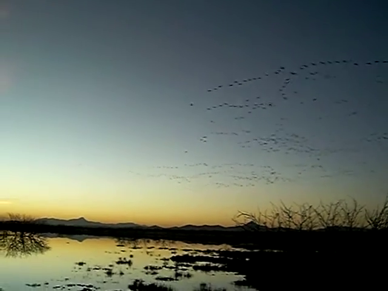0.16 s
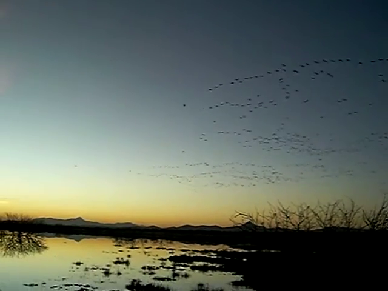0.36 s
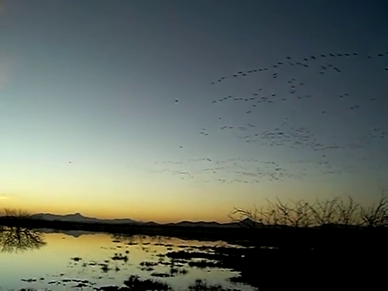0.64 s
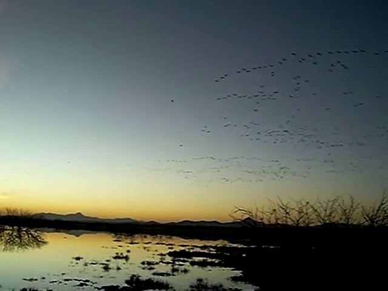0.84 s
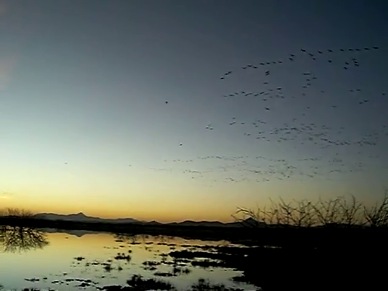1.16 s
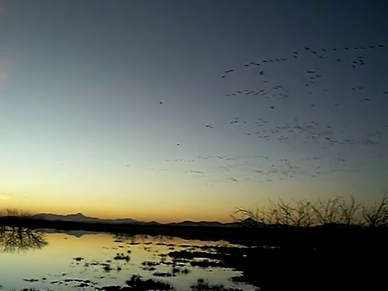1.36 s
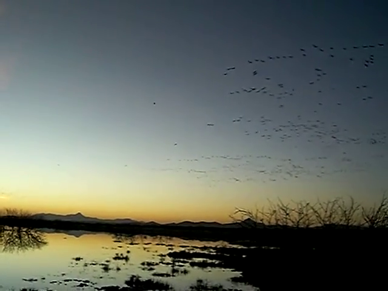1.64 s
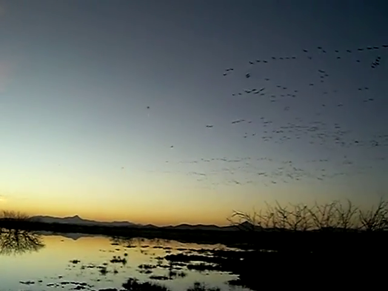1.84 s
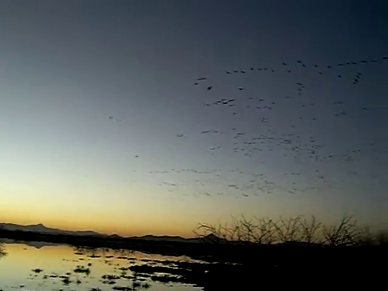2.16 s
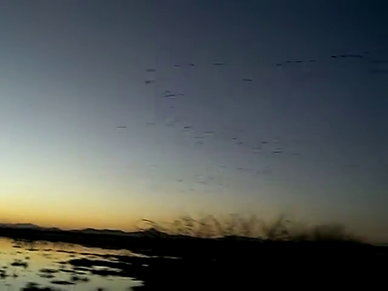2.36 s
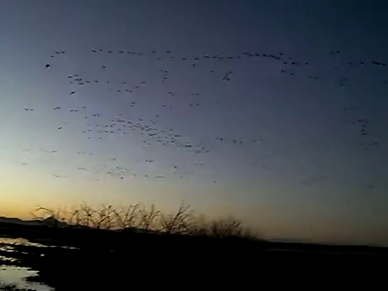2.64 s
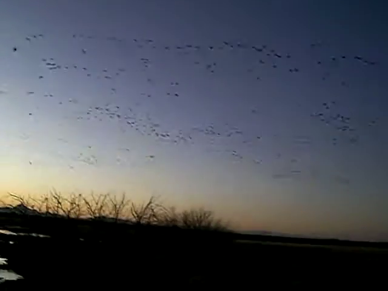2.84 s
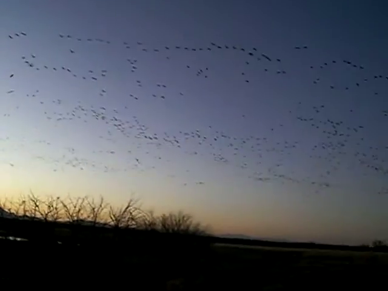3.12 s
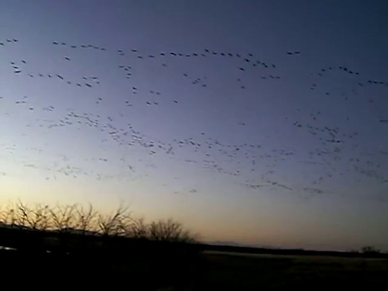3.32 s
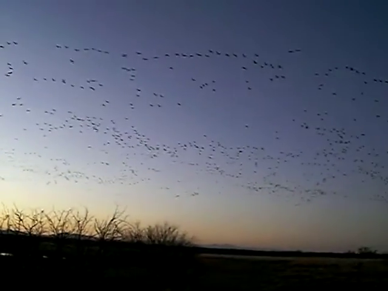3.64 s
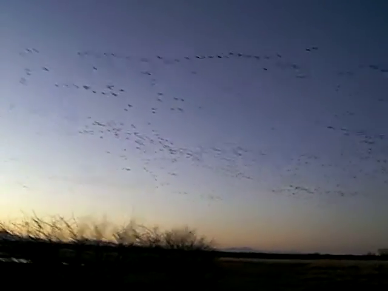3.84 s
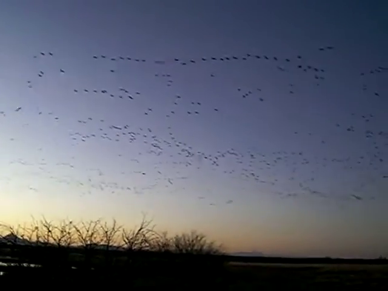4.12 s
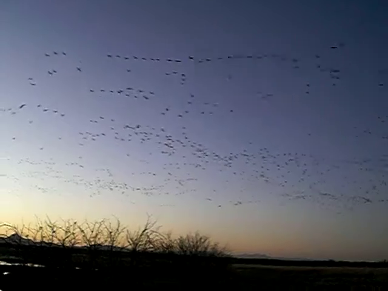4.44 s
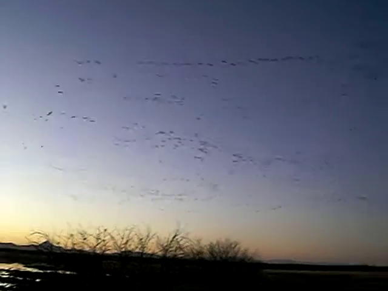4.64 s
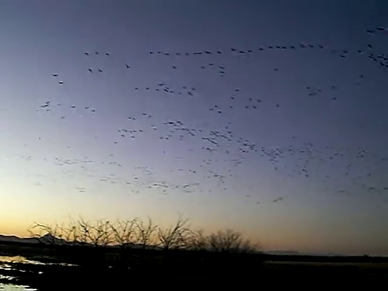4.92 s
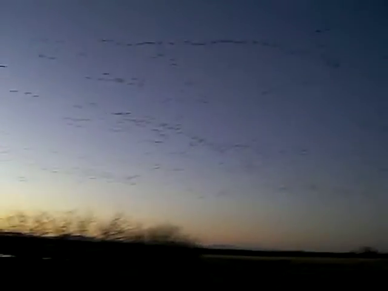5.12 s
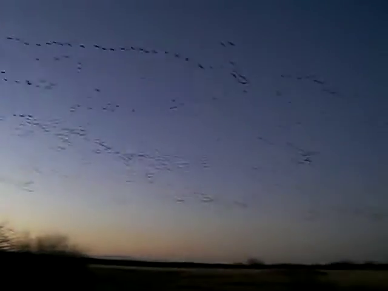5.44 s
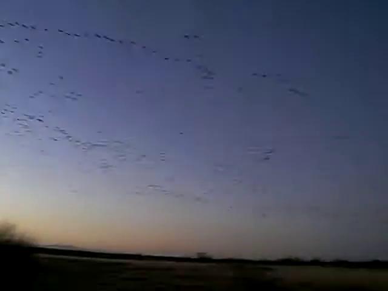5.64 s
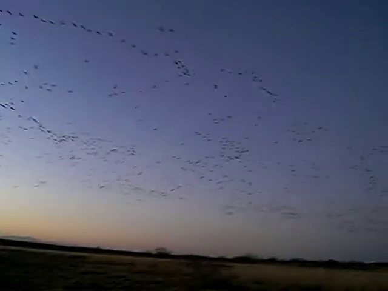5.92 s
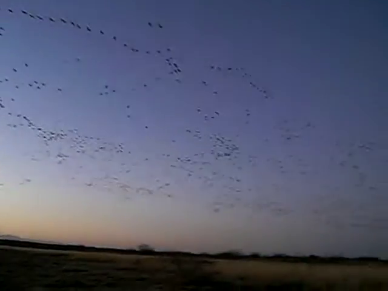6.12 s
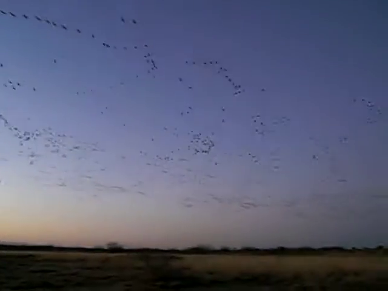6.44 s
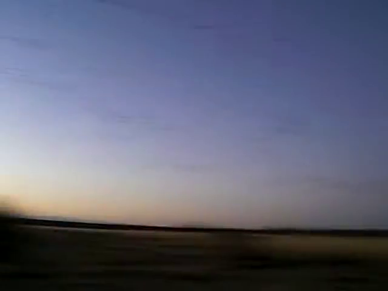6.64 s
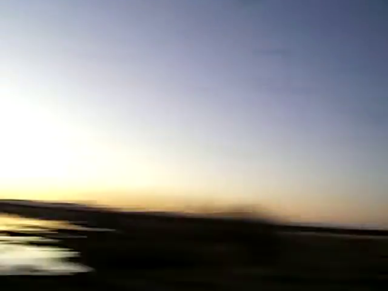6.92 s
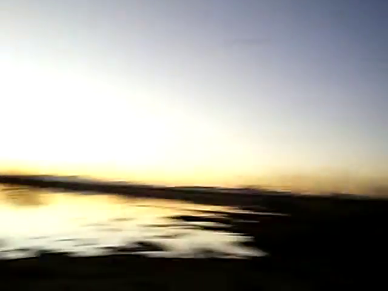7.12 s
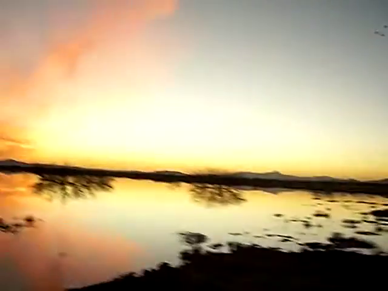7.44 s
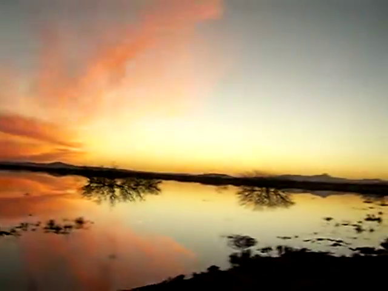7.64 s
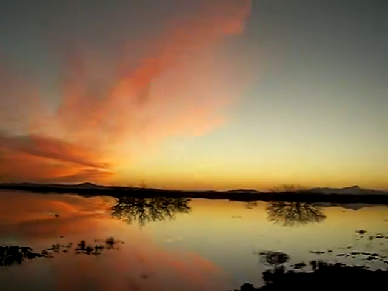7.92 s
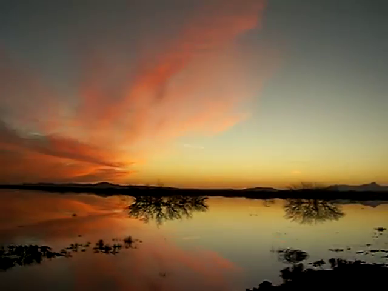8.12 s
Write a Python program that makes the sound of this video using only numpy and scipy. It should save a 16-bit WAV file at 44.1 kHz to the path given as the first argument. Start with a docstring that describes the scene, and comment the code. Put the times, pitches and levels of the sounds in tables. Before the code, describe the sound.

A huge flock of cranes passes over an open marsh, hundreds of short rattling bugles merging into a constant mid-pitched din. Single nearer calls keep popping out, each a quick rolled trill. A few goose honks come late. The small hand-held camera adds faint hiss, and after about six and a half seconds a sharp click and dull finger thumps as it swings around.

```python
"""An open marsh at dusk: hundreds of crane calls overhead, with a few goose honks among them.
Each crane call is a bugle chopped into rattling pulses; shaped noise makes the steady din of the farthest birds.
Reeds, water and banks lend a faint noise tail. Two sine tones are the hum and whine of a hand-held camera,
over soft noise; damped tones are bumps on its body, and short noises are clicks and finger rubs."""
import sys
import numpy as np
from scipy import signal
from scipy.fft import rfft, irfft, next_fast_len
from scipy.io import wavfile
from scipy.ndimage import uniform_filter1d

SR = 44100
rng = np.random.default_rng(int(sys.argv[2]) if len(sys.argv) > 2 else 0)


def log_audio(samples):
    """Write samples as a 16-bit WAV file to the path given in sys.argv[1]."""
    # one column per channel
    frames = np.atleast_2d(samples).T
    # limit to full scale, then quantise
    limited = np.clip(frames, -1, 1)
    pcm = np.round(limited * 32767).astype(np.int16)
    wavfile.write(sys.argv[1], SR, pcm)


N = 364707  # length in samples

# colour of the soft rumble and hiss: [f/Hz, relative level/dB]
FLOOR_COLOUR = [(25, -11.5), (75, -1.5), (150, -2.5), (300, -5), (1000, -1), (6000, -23.5), (8300, -21.5),
                (9000, -20.5), (11000, -20.5), (11800, -21.5), (12600, -20), (14500, -19), (15600, -12),
                (16100, -25)]
# camera hum and whine: [f/Hz, rms level/dB]
CAMERA_TONES = [(109, -70), (15734, -70)]
# fingers bump the camera body: [t/s, level/dB before trim and tone, f/Hz, t60/s]
BUMPS = [(0.401, -47, 250, 0.036), (2.081, -38, 250, 0.017), (5.35, -45, 113, 0.093),
         (6.632, -30, 332, 0.031), (6.855, -45, 60, 0.055), (7.083, -31, 139, 0.023), (7.297, -34, 60, .03),
         (7.3035, -17, 60, 0.022), (7.596, -35, 60, .028), (7.6293, -20, 61, 0.017),
         (7.8265, -35, 71.4, .025), (7.846, -30, 60.3, 0.026)]
# the camera case clicks: [t/s, level/dB before trim and tone]
CLICKS = [(2.074, -33), (4.725, -33), (6.634, -35), (6.769, -31), (6.8439, -6.5), (6.852, -34),
          (6.942, -34)]
# fingers slide on the case: [t/s, length/s, level/dB before trim and tone]
RUBS = [(5.677, 0.11, -53.5), (5.964, .13, -55), (6.176, .12, -57), (6.595, .025, -47), (7.012, .025, -46)]
# ring of the plastic case: [f/Hz, gain/dB]
CASE_RING = [(1500, -15), (4000, -8), (8200, 4), (10000, -3), (11800, 6), (13000, -1), (15500, 5)]
# colour of the farthest birds: [f/Hz, relative level/dB]
DIN_COLOUR = [(190, -75), (330, -35.5), (470, -28), (643, -9), (704, -9.5), (824, -5), (1130, -3),
              (1200, -13.5), (1500, -20), (2440, -26), (3170, -32), (4060, -39), (4750, -54), (5270, -64),
              (7500, -55.5), (9750, -81), (16500, -120)]
# the cranes' long windpipe, heard through the air: [f/Hz, relative level/dB]
WINDPIPE = [(350, -42), (520, -12), (680, -15), (820, 2), (1180, 2), (1330, -10.5), (1500, -17),
            (2000, -17), (2500, -20.5), (3100, -29), (4100, -30), (5800, -37.5), (7500, -46.5),
            (11000, -73)]
# which voices lead the chorus: [t/s, gain of the highest voices and loss of the lowest/dB]
HIGH_VOICE_LEAD = [(0, 1.9), (4.3, 2), (4.9, 3), (6.35, 1), (6.65, 0), (8.27, -2.5)]
# swell of the flock's low band, the fundamentals: [t/s, level/dB before trim]
BODY_LEVEL = [(0.0, -23.0), (0.88, -24.0), (1.54, -22.5), (2.04, -24), (2.67, -22.5), (3.51, -22.0),
              (3.64, -22.5), (4.13, -20.5), (4.34, -24), (4.47, -22), (4.6, -23.5), (5.18, -20.5),
              (5.31, -22.5), (6.22, -22), (6.68, -24.5), (6.85, -23), (8.27, -26)]
# swell of the overtones, the bugling middle of the voices: [t/s, level/dB before trim]
OVERTONE_LEVEL = [(0, -39), (0.34, -39), (1.1, -40.5), (1.52, -38.5), (1.77, -42), (2.76, -36.5),
                  (2.85, -39), (4.19, -37), (4.24, -40.5), (4.33, -38.5), (5.78, -38.5), (6.42, -36),
                  (6.61, -39.5), (6.86, -39.5), (8.04, -42), (8.27, -38)]
# swell of the treble, the rasp of the voices: [t/s, level/dB before trim]
RASP_LEVEL = [(0.0, -47), (1.34, -47.5), (1.46, -45.5), (1.96, -47), (2.75, -45), (2.88, -48.5),
              (3.42, -46), (3.64, -49), (3.88, -46), (4.8, -45), (5.1, -44.5), (5.3, -47), (5.76, -50),
              (6.01, -46), (6.68, -50.5), (6.81, -44), (7.64, -50.5), (8.14, -50), (8.27, -45.5)]
# nearer cranes: [t/s, length/s, f/Hz, glide/octaves, level/dB before trim, throat resonance f/Hz,
#                 resonance level over the fundamental/dB, rolls per second, roll depth 0-1]
CRANES = [ (0.00, 0.24, 1276, -0.082, -32.5, 3800, -25, 25, 0.9),
          (0.199, 0.12, 1030, -0.06, -33, 2060, -18, 21, 0.7),
          (0.322, 0.16, 862, -0.055, -27.5, 1900, -19, 30.6, 1),
          (0.445, .23, 1156, -0.049, -35.5, 3450, -17, 38, 0.8),
          (0.651, 0.18, 1333, -0.025, -31.5, 2690, -12.5, 29, 1),
          (0.971, 0.21, 1093, -.04, -31, 2190, -20, 27, .9),
          (1.029, 0.2, 990, -.06, -34, 3900, -20.5, 27, 1), (1.32, 0.1, 990, -.03, -37.5, 1970, -2, 26, 1),
          (1.425, 0.14, 997, -0.08, -29, 2110, -9, 28, 0.5),
          (1.52, 0.23, 1342, -0.0029, -37, 4000, -29, 28, 0.9),
          (1.647, 0.076, 975, -.09, -33.5, 1950, -8, 25, 1),
          (1.743, 0.16, 1100, -0.0029, -29.5, 5500, -29, 30, 0.8),
          (2.276, 0.15, 1020, -0.22, -38, 4080, -21, 29, 1),
          (2.431, 0.14, 776, -0.025, -40, 1560, -6, 27, 0.6),
          (2.55, 0.2, 849, -0.052, -28, 2400, -24, 22.3, 0.5),
          (2.68, 0.09, 1185, -.3, -34, 3500, -18, 27, 0.8),
          (2.815, 0.15, 866, 0.042, -28, 1730, -24, 22.4, 0.7),
          (3.056, 0.14, 1156, -0.0057, -26.5, 2300, -27, 26, 0.9),
          (3.128, 0.19, 982, -0.015, -32, 3940, -25, 25, 0.8),
          (3.39, 0.15, 1128, .05, -27, 2260, -24, 38.4, 0.84),
          (3.699, 0.14, 1125, 0, -31, 4480, -27, 28, 0.6),
          (3.829, 0.21, 921, -0.088, -30, 1840, -24, 30, 0.76),
          (3.85, 0.18, 842, -.02, -30.5, 1680, -14.5, 26, 0.7),
          (3.86, .2, 1050, 0.061, -42, 3150, -15, 38, .5),
          (4.07, .15, 852, -0.0016, -29.5, 1980, -10, 22, 0.3),
          (4.058, 0.2, 1084, -.02, -37, 4300, -19, 26, 1),
          (4.33, 0.21, 1130, -0.048, -39, 4500, -16, 25, 0.9),
          (4.411, 0.094, 882, 0.021, -26, 2700, -22, 28, 0.9),
          (4.709, 0.16, 945, -.03, -39, 3780, -22, 30, 0.96),
          (4.849, .18, 1106, 0.0026, -27.5, 2210, -16, 28, 1),
          (5.00, 0.21, 1164, 0.039, -29.5, 2320, -23, 28, .95),
          (5.006, 0.17, 1085, -0.04, -40, 4320, -17, 27, .8),
          (5.041, .13, 950, -0.12, -40, 2850, -8, 27, 1), (5.189, .25, 765, 0.096, -34, 1530, -8, 27, 0.6),
          (5.3, 0.15, 812, -.02, -37, 1620, -14, 21, .9),
          (5.301, 0.23, 948, 0.0087, -31.5, 2850, -22, 30, 1),
          (5.57, 0.18, 1184, -0.0066, -29, 2380, -25, 28, 1),
          (5.919, .13, 895, -0.044, -31.5, 2690, -18, 26, 0.65),
          (5.951, 0.23, 1100, -0.0098, -36, 4400, -26, 20, 0.6),
          (6.128, 0.14, 1128, -0.081, -26, 2250, -13.5, 25.3, 0.4),
          (6.17, 0.19, 1202, 0.0294, -28, 2400, -21, 26, 1),
          (6.276, 0.082, 1048, -0.15, -30.5, 2100, -9, 32, 0.5),
          (6.29, 0.18, 1215, -0.061, -34, 2430, -17, 31, 1),
          (6.373, 0.094, 895, -.05, -35, 1790, -12, 31, 0.9),
          (6.477, 0.103, 875, -0.037, -32.5, 1750, -6, 32, .55),
          (6.475, 0.16, 980, 0.012, -29.5, 1960, -25, 26, 1),
          (6.99, 0.066, 840, .02, -29, 1680, -13, 31, 0.8),
          (7.188, 0.17, 1130, -0.055, -32.5, 2260, -11, 32, 0.2),
          (7.186, 0.15, 898, 0, -32.5, 3600, -23, 27, 0.7),
          (7.253, 0.17, 1075, -0.044, -37, 3220, -19, 27, .5),
          (7.382, 0.18, 889, -0.068, -31.5, 1780, -22, 22, 0.9),
          (7.475, 0.18, 940, -0.03, -34.5, 1870, -13, 32, 0.9),
          (7.98, 0.13, 1225, -0.084, -46, 2450, -12, 27, 1)]
# nearer geese: [t/s, length/s, f/Hz, level/dB before trim]
GEESE = [(6.091, 0.12, 624, -44), (6.782, 0.13, 660, -34.5), (7.53, 0.074, 590, -40.5)]
# notches of the microphone housing: [f/Hz, width/Hz, depth 0-1]
HOUSING_NOTCHES = [(2179, 137, 0.56), (4710, 510, 0.76), (7920, 160, 0.6), (9300, 240, 0.6)]

OVERTONES_FROM_HZ, RASP_FROM_HZ = 1480, 2750  # band edges of the flock
DEEPEST_HZ, SHRILLEST_HZ = 500, 6500  # band of the nearer birds
CALL_S, CALL_SCATTER_S = 0.24, 0.09  # chorus call length, and its scatter either way
SAG_OCTAVES, GLIDE_SCATTER_OCTAVES = 0.04006, 0.1189  # calls bend either way, more often downwards
SLIDE_OCTAVES = 0.12  # a few calls slide down steeply
BURST_S = 0.0035  # decay time of the harsh start of a pulse
GRIT_DB = -36  # recorder hiss relative to the sound passing through
TOP_HZ = 16000  # recorder band limit


def amp(db):
    """Decibels to gain."""
    return 10 ** (np.asarray(db) / 20)


def unit(x):
    """Scale to rms 1."""
    return x / np.sqrt(np.mean(x ** 2) + 1e-20)


def curve(points):
    """One value per sample along (s, value) points."""
    return np.interp(np.arange(N) / SR, *np.transpose(points))


def wobble(t, rate):
    """A random curve with rate knots a second."""
    knots = rng.standard_normal(size=512)
    return np.interp(t * rate, np.arange(len(knots)), knots)


def add(track, s, sound):
    """Mix a sound into a track at a time, trimmed to the track's ends."""
    start = round(s * SR)
    part = sound[max(-start, 0):max(len(track) - start, 0)]
    track[max(start, 0):][:len(part)] += part


def filtered(x, response):
    """x times a response of frequency."""
    m = next_fast_len(N + SR // 2)
    return irfft(rfft(x, m) * response(np.fft.rfftfreq(m, 1 / SR)), m)[:N]


def coloured(x, points):
    """x through (Hz, dB) points on a log axis."""
    f, db = np.transpose(points)
    return filtered(x, lambda hz: amp(np.interp(np.log(hz + 1), np.log(f), db)))


def below(x, edge_hz):
    """The part of x under a steep edge."""
    return filtered(x, lambda hz: 1 / (1 + (hz / edge_hz) ** 20))


def floor(noise_db=-53):
    """Soft rumble and hiss from shaped noise, with the camera's hum and whine as steady sines."""
    t = np.arange(N) / SR
    tones = sum(amp(db) * unit(np.sin(2 * np.pi * hz * t)) for hz, db in CAMERA_TONES)
    noise = unit(coloured(rng.standard_normal(N), FLOOR_COLOUR))
    return amp(noise_db) * noise + tones


def bumps(trim_db=3, attack_s=0.00054):
    """Dull, heavily damped tones of fingers bumping the camera body."""
    track = np.zeros(N)
    t = np.arange(SR // 10) / SR
    for s, db, hz, t60 in BUMPS:
        decay = amp(db + trim_db - 60 * t / t60)
        attack = 1 - np.exp(-t / attack_s)
        add(track, s, decay * attack * np.cos(2 * np.pi * hz * t))
    return coloured(track, [(20, -5.0), (350, 0.5), (900, 5), (3000, -60)])


def clicks_and_rubs(click_db=-10.0, click_t60=0.0036, snap_gain=4.3, rub_db=-1, grain_db=4):
    """Tiny clicks and grainy finger rubs: noise that rings through the plastic camera case."""
    track = np.zeros(N)
    t = np.arange(SR // 10) / SR
    for s, db in CLICKS:
        # one sharp edge, then a brief rattle
        snap = np.r_[snap_gain, rng.standard_normal(len(t) - 1)]
        add(track, s, amp(db + click_db - 60 * t / click_t60) * snap)
    for s, length, db in RUBS:
        t = np.arange(int(length * SR)) / SR
        slips = unit(amp(grain_db * wobble(t, 404)) * rng.standard_normal(len(t)))
        add(track, s, amp(db + rub_db) * np.hanning(len(t)) * slips)
    return coloured(track, CASE_RING)


def marsh(x, wet_db, t60=0.72):
    """Reeds, water and banks scatter a faint diffuse tail."""
    t = np.arange(SR) / SR
    tail = rng.standard_normal(SR) * amp(-60 * t / t60)
    return x + amp(wet_db) * signal.fftconvolve(x, tail / np.linalg.norm(tail))[:N]


def cycle(harmonic_db, size=2048):
    """One period of a voice with these harmonic levels."""
    k = np.arange(len(harmonic_db)) + 1
    return amp(harmonic_db) @ np.sin(2 * np.pi * np.outer(k, np.arange(size) / size))


def call(length, hz, glide, period, roll_rate, roll_depth, jitter, chirp,
         drift=0.097, arch=0.03413, fade=5.54, uneven_db=1.5, burst=0.61):
    """One call: an arching pitch, chopped into quick, uneven pulses that start harshly and fade."""
    t = np.arange(int(length * SR)) / SR
    u = t / length - 0.5
    beats = roll_rate * t + 1 + drift * wobble(t, 18.23)
    beat = beats % 1  # position inside the pulse
    strength = amp(uneven_db * rng.standard_normal(size=64))[beats.astype(int)]
    pulse = unit(strength * beat * (1 - beat) * np.exp(-fade * beat))
    # the pitch follows the air pressure inside each pulse
    octaves = glide * u - arch * (2 * u) ** 2 + chirp * (pulse - 1) + jitter * wobble(t, 251.7)
    phase = np.cumsum(hz * np.exp2(octaves)) / SR
    voice = period[(phase * len(period)).astype(int) % len(period)]
    swell = np.sqrt(np.abs(1 - (2 * u) ** 2))
    # each pulse bursts open with a brief, rough spike
    spike = burst * strength * np.exp(-beat / roll_rate / BURST_S) * (1 + wobble(t, 1200))
    roll = 1 - roll_depth + roll_depth * (pulse + spike)
    return unit(voice * swell * roll)


def din():
    """The farthest birds, merged into a steady band of shaped noise."""
    return unit(coloured(rng.standard_normal(N), DIN_COLOUR))


def chorus(count=800, spread_db=2.0, bright_db=3.0, roll_rate=27, mid_hz=980):
    """Overlapping crane calls, each with its own pitch, timbre, roll and closeness."""
    track = np.zeros(N)
    # high and low voices take turns, so every register stays busy
    registers = np.concatenate([rng.permutation(np.linspace(-1, 1, 20)) for _ in range(count // 20)])
    for i, (when, long, detune, glide, roll, near) in enumerate(rng.uniform(-1, 1, (count, 6))):
        s = (i + when) / count * (N / SR + 0.2) - 0.2
        hz = mid_hz * 2 ** (0.5 * registers[i] + detune / 30)
        closeness = near + near ** 3
        # the air takes the overtones of far birds, so only close ones ring out up high
        overtone_db = bright_db * (closeness - 1) + 1.3 * rng.standard_normal(size=6)
        period = cycle(np.r_[0, overtone_db])
        rate = roll_rate * (1 + 0.239 * roll)
        length = CALL_S + CALL_SCATTER_S * long
        bend = GLIDE_SCATTER_OCTAVES * glide - SAG_OCTAVES
        bend -= SLIDE_OCTAVES * min(glide, 0) ** 6
        voice = call(length, hz, bend, period, rate, 1, jitter=0.01, chirp=0.018)
        lead_db = registers[i] * np.interp(s, *np.transpose(HIGH_VOICE_LEAD))
        add(track, s, amp(spread_db * closeness + lead_db) * voice)
    return unit(coloured(marsh(track, wet_db=-10.5), WINDPIPE))


def flock(din_db=-8, body_db=-0.43, overtone_db=-0.18, rasp_db=-2.15):
    """Chorus and din in three bands on set level curves: fundamentals carry far, upper bands come and go."""
    voices = chorus() + amp(din_db) * din()
    body = below(voices, OVERTONES_FROM_HZ)
    rasp = voices - below(voices, RASP_FROM_HZ)
    overtones = voices - body - rasp
    # overtones and rasp stand for changing heading and distance
    return (amp(curve(BODY_LEVEL) + body_db) * unit(body)
            + amp(curve(OVERTONE_LEVEL) + overtone_db) * unit(overtones)
            + amp(curve(RASP_LEVEL) + rasp_db) * unit(rasp))


def near_geese(track, trim_db=-2):
    """Add goose honks: steady-pitched calls with a shallow, quick roll and few harmonics."""
    period = cycle([3.0, -13.0, -14, -23])
    for s, length, hz, db in GEESE:
        honk = call(length, hz, 0, period, 47.4, 0.29, jitter=0.0097, chirp=0)
        add(track, s, amp(db + trim_db) * honk)


def near_cranes(track, trim_db=-1, skirt_db_per_khz=15, second_db=-22, loss_db_per_khz=9):
    """Add single rolled bugles, each with overtones lifted around its own throat resonance."""
    for s, length, hz, glide, db, throat_hz, throat_db, roll_rate, roll_depth in CRANES:
        overtone_hz = hz * np.arange(2, 7)
        ringing = throat_db - skirt_db_per_khz * np.abs(overtone_hz - throat_hz) / 1000
        falling = second_db - loss_db_per_khz * (overtone_hz - 2 * hz) / 1000
        period = cycle(np.r_[0, np.maximum(ringing, falling)])
        bugle = call(length, hz, glide, period, roll_rate, roll_depth, jitter=0.004, chirp=0.008,
                     drift=0.03, arch=0.02, fade=6, uneven_db=1, burst=0.35)
        add(track, s, amp(db + trim_db) * bugle)


def near_birds():
    """Nearer geese and cranes, band-limited and given the marsh's tail."""
    track = np.zeros(N)
    near_geese(track)
    near_cranes(track)
    track -= below(track, DEEPEST_HZ)
    return marsh(below(track, SHRILLEST_HZ), wet_db=-9)


def scene():
    """The floor, camera handling and birds, in mono."""
    handling = bumps() + clicks_and_rubs()
    return (floor() + handling + flock() + near_birds())[None]


def housing(f):
    """Microphone housing: resonances that cut narrow notches."""
    cuts = [1 - depth * 1j * f * width / (centre * centre - f * f + 1j * f * width)
            for centre, width, depth in HOUSING_NOTCHES]
    return np.prod(cuts, axis=0)


def record(dry):
    """The recorder adds fine grit that rides on the loudness, then housing notches and a band limit."""
    envelope = np.sqrt(np.abs(uniform_filter1d(dry[0] ** 2, size=96)))
    gritty = dry[0] + amp(GRIT_DB) * envelope * rng.standard_normal(N)
    return filtered(gritty, lambda hz: housing(hz) * (hz < TOP_HZ))[None]


dry = scene()
out = record(dry)
log_audio(out)
```